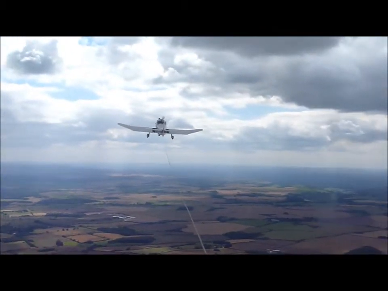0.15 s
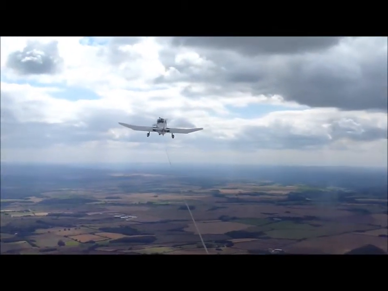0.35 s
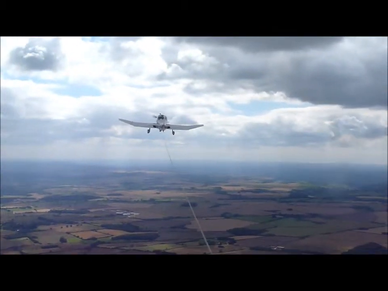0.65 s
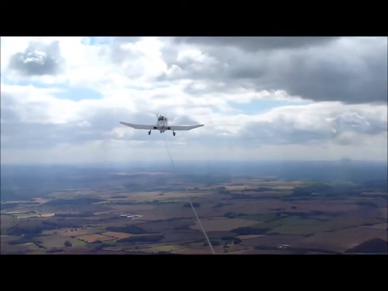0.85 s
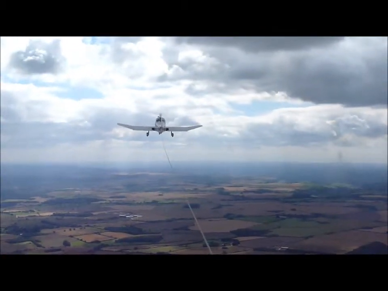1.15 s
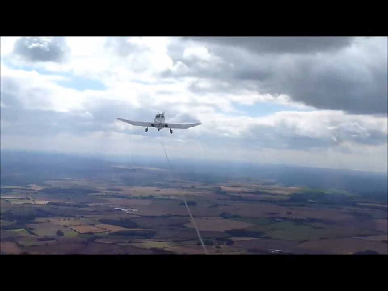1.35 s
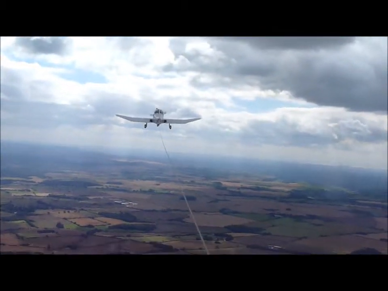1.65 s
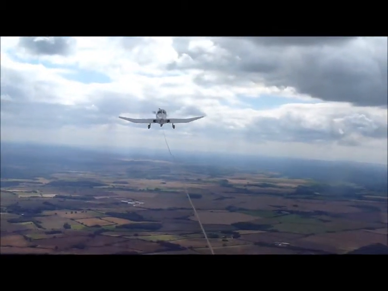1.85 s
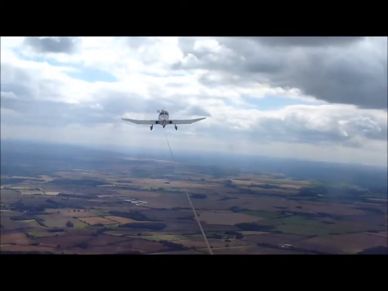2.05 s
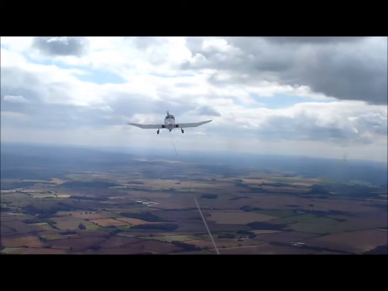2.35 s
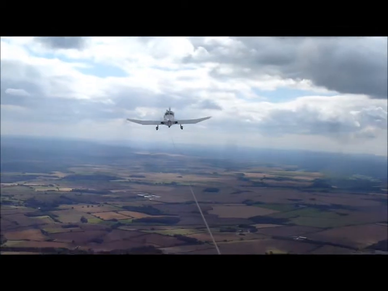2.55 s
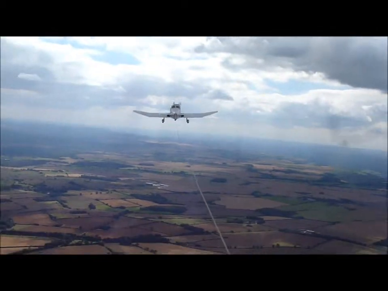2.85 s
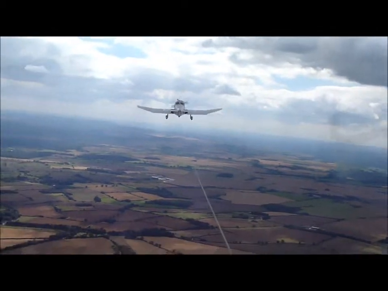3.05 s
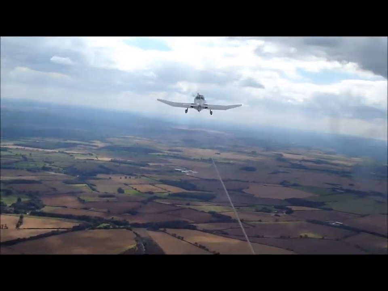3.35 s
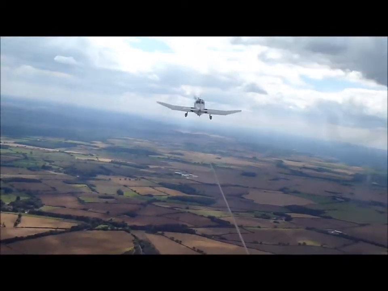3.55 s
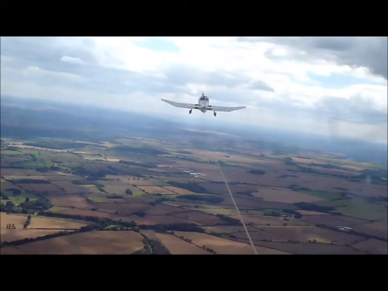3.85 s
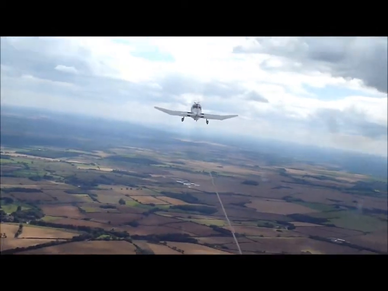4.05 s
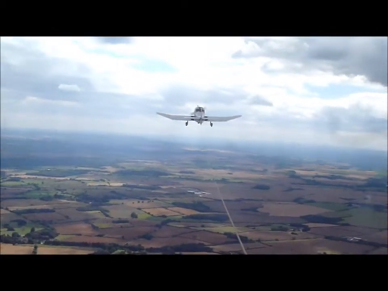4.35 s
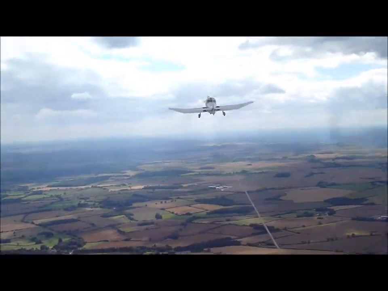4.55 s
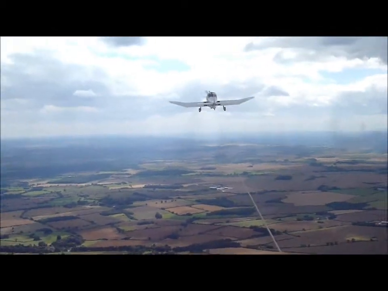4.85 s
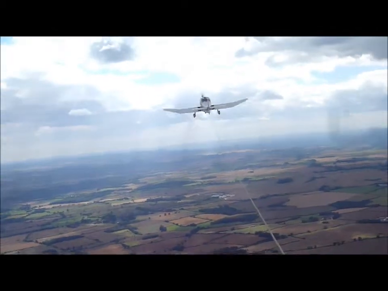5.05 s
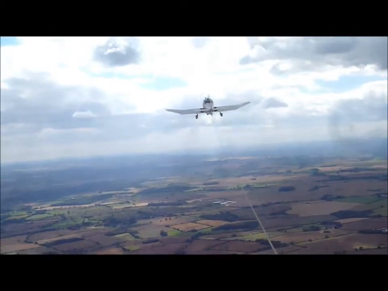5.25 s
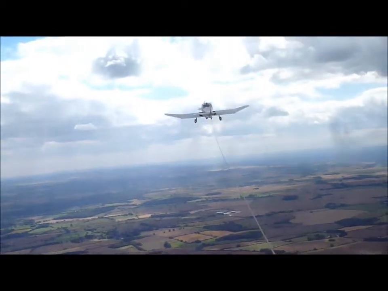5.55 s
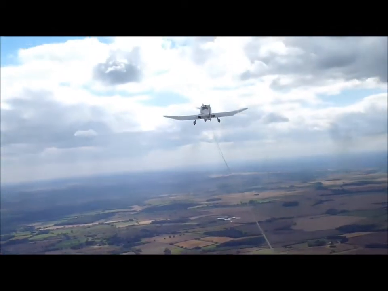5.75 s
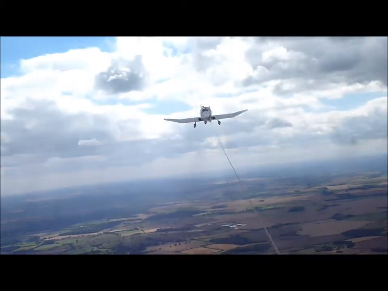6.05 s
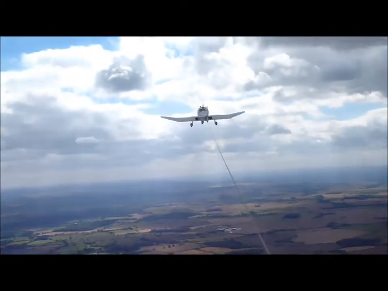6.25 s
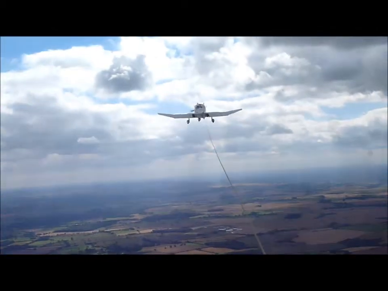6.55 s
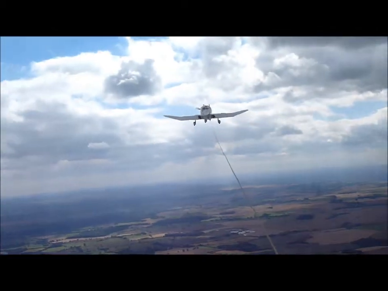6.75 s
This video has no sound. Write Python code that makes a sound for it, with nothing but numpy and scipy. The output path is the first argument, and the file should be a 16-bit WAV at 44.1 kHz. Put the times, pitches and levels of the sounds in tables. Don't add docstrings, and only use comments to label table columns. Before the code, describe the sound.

A steady cockpit wind bed runs from start to end without a break. Low buffeting swells several times a second, canopy air hums hollowly, and small lumps of air pat the fuselage, thickest in the final second. Over it lies airy vent hiss with faint whistling tones; its colour shifts slightly past the middle as the microphone turns. A distant propeller engine drones weakly ahead. Enclosed, mono, with muffled top end.

```python
import sys
import numpy as np
from scipy import signal
from scipy.fft import rfft, irfft, next_fast_len
from scipy.io import wavfile
from scipy.ndimage import uniform_filter1d, map_coordinates

SR = 44100
rng = np.random.default_rng(int(sys.argv[2]) if len(sys.argv) > 2 else 0)


def inscribe(sig):
    pcm = np.round(np.clip(np.atleast_2d(sig).T, -1, 1) * 32767)
    wavfile.write(sys.argv[1], SR, pcm.astype(np.int16))


def attenuation_scalar(level_db):
    decades = np.asarray(level_db, float) / 20
    return 10 ** decades


N = 304731


def unit(x):
    return x / np.sqrt(np.mean(x ** 2) + 1e-20)


def along(points, hz):
    f, db = np.transpose(points)
    return np.interp(np.log(hz + 1), np.log(f + 1), db)


def coloured(points):
    return lambda f: attenuation_scalar(along(points, f))


def modes(table, sharpness=1):
    def gain(f):
        power = sum((attenuation_scalar(db) * f * w) ** 2 / ((c * c - f * f) ** 2 + (f * w) ** 2) for c, w, db in table)
        return np.sqrt(power) ** sharpness
    return gain


def inside(table):
    return lambda f: modes(table)(f) / (1 + (f / 950) ** 4)


def curve(rows):
    s, value = np.transpose(rows)
    return np.interp(np.arange(N) / SR, s, value)


def around_mean(rows):
    db = curve(rows)
    return db - db.mean()


def bells(times, db, half_s):
    t = np.arange(0, N + 200, 100) / SR
    rise = np.exp(-((t[:, None] - times) / half_s) ** 2) @ db
    return np.interp(np.arange(N) / SR, t, rise)


def surges(rows, half_s):
    return bells(*np.transpose(rows), half_s)


def wobble(rate):
    knots = rng.standard_normal(int(N * 40 / SR))
    return map_coordinates(knots, [np.arange(N) * rate / SR])


def turbulence(gain, patchy_db):
    z = signal.stft(rng.standard_normal(N + 512), nperseg=512)[2]
    patches = uniform_filter1d(rng.standard_normal(z.shape), size=5, axis=0)
    patches = uniform_filter1d(patches, size=12, axis=1)
    x = signal.istft(z * attenuation_scalar(patchy_db * unit(patches)), nperseg=512)[1][:N]
    m = next_fast_len(N + 8192)
    return unit(irfft(rfft(x, m) * gain(np.fft.rfftfreq(m, 1 / SR)), m)[:N])


def drifting(x, share):
    return map_coordinates(x, [np.cumsum(1 + share - share.mean())], mode="mirror")


def held(x, hold=0.55, hold_s=0.2):
    swing = np.sqrt(np.abs(uniform_filter1d(x ** 2, round(hold_s * SR))) + 1e-9)
    return unit(x / swing ** hold)


# centre_s, level_db, skin_share (0-1, the part that strikes the fuselage skin)
SWELLS = [(.22, -1, 0.1), (.5, -6, 1), (.8, -3, 0.2), (1.18, 0, 0.2), (1.58, 3.5, 0.2), (1.78, 0.5, 0.9),
          (1.97, 3.5, 0), (2.15, 3, 0.9), (2.45, 5, 0.6), (3.03, 0, 1), (2.7, -1.5, .5), (3.4, -2.5, 0.94),
          (3.62, 1.5, 0), (3.85, 1, .8), (4.1, -2, 0.4), (4.3, 4, 0.04), (4.5, -4, 0), (4.73, 3.5, 1),
          (4.92, 3, 0.4), (5.2, -0.5, .2), (5.48, 2.5, 0.3), (5.75, 3.5, 0.26), (6.15, 3.5, 0.8),
          (6.3, -2, .5), (6.45, 4.5, 0.2), (6.7, -0.5, 0.6), (6.85, 2.5, 0)]
# pitch_hz, level_db (per Hz)
BUFFET = [(10, -30), (19, -7.5), (31, 4), (45, 5.5), (100, 6.5), (140, 6), (300, -41.5), (900, -120)]
# pitch_hz, width_hz, level_db
BOOM = [(139, 28, -5), (177.8, 33, 2), (215, 19, -4)]
# time_s, strength_db
SLIP = [(0, -30), (.3, -29.5), (.9, -30.5), (1.3, -29.5), (1.7, -29), (1.95, -28.5), (2.4, -28.5),
        (2.75, -26.5), (3.1, -28.5), (3.5, -27), (3.9, -27.5), (4.25, -28), (4.65, -29.5), (5.1, -30.5),
        (5.45, -28), (5.9, -30.5), (6.3, -29.5), (6.91, -31)]
BUFFET_DB, BOOM_DB, SWELL_S = -31.5, -31, 0.13
BOOM_SLIPS = 0.4


def buffet_and_boom(lumps, flex):
    s, db, skin = np.transpose(SWELLS)
    buffet_db = BUFFET_DB + bells(s, db * (1 - skin), SWELL_S)
    boom_db = BOOM_DB + bells(s, db * skin, SWELL_S) + BOOM_SLIPS * around_mean(SLIP)
    buffet = turbulence(coloured(BUFFET), patchy_db=1.2) * attenuation_scalar(1.1 * wobble(23) + 0.44 * lumps)
    boom = turbulence(inside(BOOM), patchy_db=-0.5) * attenuation_scalar(0.48 * wobble(24) + 0.37 * lumps)
    buffet = held(buffet, hold=0.7, hold_s=0.09)
    return attenuation_scalar(buffet_db) * buffet + attenuation_scalar(boom_db) * held(drifting(boom, flex))


# centre_s, rise_db
DRAGS = [(.1, 2), (.3, 0), (.7, 3.5), (1.05, 1.5), (1.25, 2), (1.52, 1.5), (1.76, 4), (1.9, 0.5), (2.3, 4),
         (2.45, 5), (2.6, 1), (2.8, -1.5), (3.1, 1.5), (3.3, 1), (3.48, 4.5), (3.75, 1.5), (4.25, 2.5),
         (4.55, 4), (4.9, 4.5), (5.3, 0.5), (5.67, 3.5), (5.9, 5), (6.2, 1), (6.55, 2), (6.7, 2.5)]
# pitch_hz, width_hz, level_db
CABIN = [(294, 61, -10), (368, 35, 1.5), (473, 35, 0.5)]
# pitch_hz, width_hz, level_db
CANOPY = [(608.6, 56, 0)]
# centre_s, rise_db
HUMS = [
    (1.7, 1.5),
    (2.5, -0.5),
    (2.75, 1.5),
    (3, 5),
    (3.25, 2.5),
    (3.5, -1),
    (4.1, -4.5),
    (4.7, 5.5),
    (5.4, 4),
    (6.15, 2),
]
CABIN_DB, RUSH_DB = -34.5, -39.5
CABIN_SLIPS, RUSH_SLIPS = 0.58, 2.2


def cabin_and_canopy(lumps, flex):
    slip, drag = around_mean(SLIP), surges(DRAGS, 0.06)
    cabin_db = CABIN_DB + CABIN_SLIPS * slip + drag
    rush_db = RUSH_DB + RUSH_SLIPS * slip + 0.47 * drag + surges(HUMS, 0.15)
    cabin = turbulence(inside(CABIN), patchy_db=-0.75) * attenuation_scalar(0.29 * wobble(16) + 1.3 * lumps)
    rush = turbulence(inside(CANOPY), patchy_db=0.5) * attenuation_scalar(0.36 * wobble(12) + 0.29 * lumps)
    return attenuation_scalar(cabin_db) * held(drifting(cabin, flex)) + attenuation_scalar(rush_db) * held(drifting(rush, flex))


# pitch_hz, width_hz, level_db
SEAL = [(721, 110, 0.5), (805, 45, 0.5), (837, 25, -8)]
# centre_s, rise_db
HISSES = [(.5, -0.5), (1.4, 0.5), (2.25, 1), (2.9, -4), (3.5, 0), (4.2, 1.5), (4.8, 2), (5.1, -0.5),
          (5.45, -1.5), (6.1, -1.5), (6.6, -1.5)]
# time_s, strength_db
FLOW = [(0, -34), (.5, -33.5), (.95, -33), (1.25, -32), (1.7, -31), (2.2, -32), (2.56, -31.5), (2.9, -33),
        (3.3, -32.5), (3.48, -31.5), (3.95, -33), (4.25, -32), (4.45, -33.5), (4.65, -32), (5.2, -33),
        (5.8, -32), (6.35, -32.5), (6.91, -33.5)]
SEAL_DB, SEAL_SLIPS, SEAL_FLOWS = -39, 1, 0.55


def canopy_seal(lumps):
    seal_db = SEAL_DB + SEAL_SLIPS * around_mean(SLIP) + SEAL_FLOWS * around_mean(FLOW)
    seal = turbulence(inside(SEAL), patchy_db=0.5) * attenuation_scalar(0.39 * lumps)
    return attenuation_scalar(seal_db + surges(HISSES, 0.098)) * held(seal)


HULL_DRIFT, HULL_WANDER = 0.02, 0.01


def hull():
    lumps = wobble(22)
    slow = uniform_filter1d(lumps, size=SR // 4) * np.sqrt(5)
    flex = HULL_DRIFT * lumps + HULL_WANDER * slow
    return buffet_and_boom(lumps, flex) + cabin_and_canopy(lumps, flex) + canopy_seal(lumps)


# start_s, level_db, pitch_hz, length_cycles, knock_db
BUMPS = [(0.437, -10, 207, 5.1, -21), (2.135, -12, 146, 3.1, -16), (2.425, -26, 363, 3.3, -13),
         (2.799, -11, 107, 2.6, -4), (2.828, -9, 159, 1.1, -20), (3.054, -7.5, 188, 2.3, -17),
         (5.386, -13, 102, 3, -13), (5.461, -8.5, 156, 2.2, -8), (6.043, -9.5, 195, 2.5, -28),
         (6.154, -13, 182, 5.1, -22), (6.18, -10.5, 185, 4.1, -6), (6.391, -5, 119, 1.4, -1),
         (6.458, -10.5, 170, 2.1, -20), (6.652, -7.5, 152, 1.6, -23), (6.691, -6, 199, 1.1, -12),
         (6.74, -13, 199, 3.5, -13), (.227, -13.5, 98, 3.2, -18), (.325, -17, 171, 2.4, -15),
         (.603, -10.5, 171, 2.7, -18), (0.758, -10, 188, 1.9, -18), (1.158, -12, 150, 2.1, -14),
         (1.233, -10.5, 97, 2.5, -8), (1.472, -14, 150, 3, -11), (1.747, -16, 425, 2.8, -15),
         (1.967, -16, 150, 1.7, -15), (1.976, -12, 103, 2, -15), (2.399, -13, 110, 1.3, -13),
         (3.025, -12.5, 357, 3.6, -5), (3.487, -16, 352, 2, -15), (3.816, -11, 169, 2.2, -12),
         (3.856, -15, 200, 3.2, -13), (4.28, -13, 175, 2, -4), (4.339, -8, 97, 2.1, -17),
         (4.64, -11, 178, 2.2, -17), (4.812, -14, 101, 1.8, -9), (5.614, -16, 167, 2, -19),
         (5.66, -11.5, 160, 2.8, -7), (5.803, -17, 98, 1.4, -20), (6.408, -13, 174, 2.9, -18),
         (6.823, -24, 94, 1.1, -15),
         (6.194, -16, 200, 1.2, 3),
    (6.12, -17, 97, 1.6, -20),
    (4.69, -12, 195, 4.5, -20),
    (5.4, -14, 198, 5, -20),
    (6.425, -16, 120, 3, -22),
    (3.7, -21, 195, 4.3, -23),
    (3.3, -13, 180, 1.7, -10),
    (4.92, -14, 110, 1.1, -15),
    (2.7, -15, 250, 2.5, -14),
]


def bumps():
    out, t = np.zeros(N + SR), np.arange(SR // 20) / SR
    frame = np.sin(2 * np.pi * 420 * t) + 0.26 * np.sin(2 * np.pi * 680 * t)
    knock = np.sin(np.pi * np.clip(t / 0.011, 0, 1)) ** 2 * frame
    for s, db, hz, cycles, knock_db in BUMPS:
        progress = np.clip(t * hz / cycles, 0, 1)
        push = np.sin(np.pi * progress) ** 2 * np.sin(2 * np.pi * hz * t)
        out[round(s * SR):][:len(t)] += attenuation_scalar(db - 6) * (push + attenuation_scalar(knock_db) * knock)
    return out[:N]


# pitch_hz, level_db (per Hz)
JET = [(300, -120), (700, -26.5), (900, -1.5), (1080, 0.5), (1230, -3.5), (1600, 0), (1870, -1),
       (2170, -5.5), (2400, -15), (3000, -47), (6000, -120)]
# pitch_hz, level_db (per Hz)
FIZZ = [(1290, -28), (2200, -1.5), (2420, -3), (2640, -1.5), (3520, -7.5), (3720, -6.5), (3980, -3),
        (4170, -4), (4670, -10), (5370, -13), (6500, -27.5), (8450, -56), (14300, -120)]
# pitch_hz, change_db
SHADOW = [(2300, -3.5), (3400, 3), (4100, -0.5), (4700, -0.5), (5300, -4.5), (5900, -0.5), (6800, 2)]
# time_s, turned (0-1)
TURN = [(0, .1), (1.2, 0.12), (1.7, 0.2), (3, 0.22), (4.2, 0.06), (4.45, .1), (4.65, 0.82), (5, 1),
        (5.3, 0.93), (5.9, 0.8), (6.3, .6), (6.91, .6)]
# pitch_hz, width_hz, level_db
WHISTLE = [(2000, 58, 0), (1945, 50, -7), (2130, 70, -13)]
# centre_s, whistle_gain_db
SINGS = [(1.15, -0.5), (1.58, 3.5), (.4, 1), (2.3, 1), (2.9, -2), (3.3, -1.5), (3.6, 1.5), (5.3, -2),
         (5.7, 0.5), (6.6, 1), (3.85, 3.5), (4.15, 2), (4.9, -1), (6.15, 1)]
# centre_s, rise_db
PUFFS = [(.12, 1.5), (.3, 1), (.6, 1), (.75, 0), (1.03, 0.5), (1.2, -0.5), (1.5, 0.5), (1.74, 1),
         (1.83, 1.5), (1.96, 2), (2.3, 1.5), (2.49, -2), (2.7, 0), (3.02, 1.5), (3.47, 1.5), (3.62, -2.5),
         (3.8, 0), (4.1, -1), (4.24, 1.5), (4.39, -1.5), (4.55, -0.5), (4.65, 0.5), (4.85, 1), (5.1, -1),
         (5.25, 1), (5.45, 1.5), (5.7, -2), (5.9, 0.5), (6, -2), (6.12, 0.5), (6.43, -0.5), (6.6, 0.5),
         (6.7, 2)]
PUFF_S, JET_PUFFS = 0.028, 0.96
JET_DB, FIZZ_DB, WHISTLE_DB = -35, -39, -39.5
JET_FLOWS, FIZZ_FLOWS, WHISTLE_FLOWS = 1.2, 0.99, 0.41


def vent():
    flow, turned = around_mean(FLOW), curve(TURN)
    sway, puffs = wobble(12), surges(PUFFS, PUFF_S)
    flutter = 0.22 * sway + JET_PUFFS * puffs
    jet = turbulence(coloured(JET), patchy_db=0.3)
    whistle = turbulence(modes(WHISTLE, sharpness=1.18), patchy_db=1.0)
    whistle = held(drifting(whistle, 0.004 * sway), hold=0.6, hold_s=0.035)
    facing = turbulence(coloured(FIZZ[:-2]), patchy_db=0.55)
    away = turbulence(lambda f: attenuation_scalar(along(FIZZ[:-2], f) + along(SHADOW, f)), patchy_db=0.5)
    fizz = np.sqrt(1 - turned) * facing + np.sqrt(turned) * away
    jet_db = JET_DB + JET_FLOWS * flow
    whistle_db = WHISTLE_DB + WHISTLE_FLOWS * flow + surges(SINGS, 0.085)
    fizz_db = FIZZ_DB + FIZZ_FLOWS * flow + (1 - JET_PUFFS) * puffs + 0.2 * wobble(9.7)
    return attenuation_scalar(flutter) * (attenuation_scalar(jet_db) * jet + attenuation_scalar(whistle_db) * whistle + attenuation_scalar(fizz_db) * fizz)


# pitch_hz, width_hz, level_db
OVERTONE = [(4075, 140, 0), (4340, 110, -3.5), (3920, 130, -4.5)]
# time_s, pitch_hz
OVERTONE_PITCH = [(0, 4086), (.9, 4059), (1.2, 4105), (1.9, 4075), (2.7, 4086), (3.3, 4035), (4.3, 4080),
                  (4.8, 4056), (5.2, 4008), (5.9, 3994), (6.3, 4072), (6.91, 4048)]
# centre_s, rise_db
RINGS = [(.1, 1), (.55, 0.5), (.95, -3.5), (1.22, 3.5), (1.5, 0), (1.85, 3), (2.3, -1), (2.65, 2.5),
         (3.05, -1), (3.4, -1), (3.85, 1.5), (4.1, -10), (4.45, 0), (4.8, 1.5), (5.15, 2.5), (5.42, 2.5),
         (5.7, 2), (6, 5.5), (6.4, 3.5), (6.75, 3)]
# pitch_hz, width_hz, level_db
DUCT_FACING = [(1790, 75, 0)]
# pitch_hz, width_hz, level_db
DUCT_AWAY = [(1610, 70, 0)]
OVERTONE_DB, DUCT_FACING_DB, DUCT_AWAY_DB = -48, -45.5, -47.5
OVERTONE_FLOWS = 0.5


def vent_modes():
    flow, pitch, turned = around_mean(FLOW), curve(OVERTONE_PITCH), curve(TURN)
    puffs = JET_PUFFS * surges(PUFFS, PUFF_S)
    upper = turbulence(modes(OVERTONE, sharpness=1.4), patchy_db=1.0)
    upper = held(drifting(upper, pitch / pitch.mean() - 1))
    upper_db = OVERTONE_DB + OVERTONE_FLOWS * flow + surges(RINGS, 0.16)
    front = held(turbulence(modes(DUCT_FACING, sharpness=1.4), patchy_db=3.5))
    side = held(turbulence(modes(DUCT_AWAY, sharpness=1.4), patchy_db=3.5))
    duct = attenuation_scalar(DUCT_FACING_DB) * np.sqrt(1 - turned) * front + attenuation_scalar(DUCT_AWAY_DB) * np.sqrt(turned) * side
    return attenuation_scalar(puffs) * (attenuation_scalar(upper_db) * upper + attenuation_scalar(flow) * duct)


# pitch_hz, width_hz, level_db
FLOOR_PAN = [(270.6, 112, 0)]
# centre_s, rise_db
THROBS = [(.25, -8), (.7, -1.5), (1.2, -4), (1.6, -2), (2.05, 0.5), (2.45, -4), (2.75, 4), (3.05, -0.5),
          (3.5, 0), (3.9, -1), (4.3, -1), (4.7, 2.5), (5.1, -2), (5.5, -3), (5.8, -0.5), (6.1, 0.5),
          (6.4, 2), (6.75, 0)]


def floor_pan(level_db=-36):
    drum = held(turbulence(modes(FLOOR_PAN, sharpness=1.26), patchy_db=1.7))
    return attenuation_scalar(level_db + 0.45 * around_mean(SLIP) + surges(THROBS, 0.18)) * drum


# multiple (of the firing rate), level_db
ENGINE = [(1, -5), (2, 1), (3, -18.5), (4, -9)]


def tow_plane(firing_hz=85.8, level_db=-44):
    phase = 2 * np.pi * np.cumsum(firing_hz * (1 + 0.02 * wobble(9))) / SR
    return attenuation_scalar(level_db) * sum(attenuation_scalar(db + 1.9 * wobble(12)) * np.sin(k * phase) for k, db in ENGINE)


def scene():
    return (hull() + bumps() + vent() + vent_modes() + floor_pan() + tow_plane())[None]


# start_s, depth_db
DUCKS = [(.44, 2.5), (.8, 1.5), (1.76, 4), (1.98, 2.5), (2.22, 2.5), (2.42, 3), (3.06, 1.5), (3.54, 2.5),
         (3.8, 2), (4.3, 3), (4.95, 0), (5.47, 1.5), (5.75, 1.5), (5.93, 2.5), (6.2, 3), (6.3, 5),
         (6.41, 1), (6.6, 3.5), (6.72, 2.5)]
DUCK_S, RECOVER_S = 0.024, 0.081


def gain_control():
    gain_db = np.zeros(N)
    for s, depth_db in DUCKS:
        after = np.clip(np.arange(N) / SR - s, 0, None)
        gain_db -= depth_db * (1 - np.exp(-after / DUCK_S)) * np.exp(-after / RECOVER_S)
    return gain_db


# pitch_hz, level_db
MIC = [(5500, 0.5), (6500, 3), (7000, -4), (7400, -11.5), (7650, -23.5), (7900, -50)]


def microphone(x):
    m = next_fast_len(N + 8192)
    return irfft(rfft(x, m) * coloured(MIC)(np.fft.rfftfreq(m, 1 / SR)), m)[..., :N]


def band_limit(x):
    return signal.sosfilt(signal.butter(12, 7850, fs=SR, output="sos"), x)


def record(dry):
    mix = microphone(dry * attenuation_scalar(gain_control()))
    return band_limit(mix)


dry = scene()
out = record(dry)
inscribe(out)
```